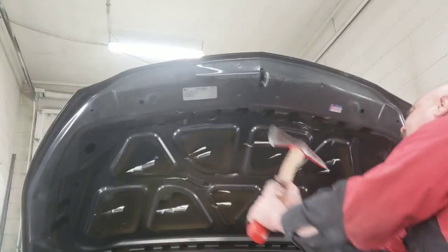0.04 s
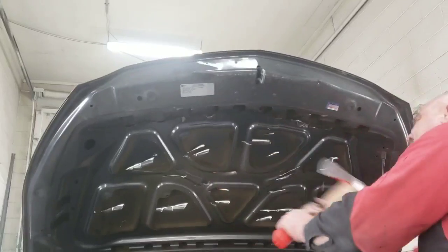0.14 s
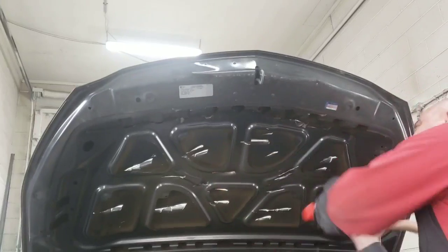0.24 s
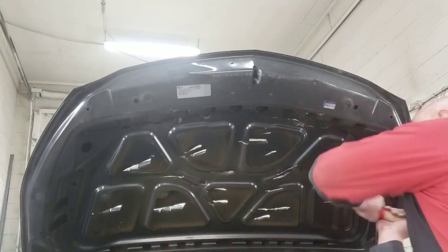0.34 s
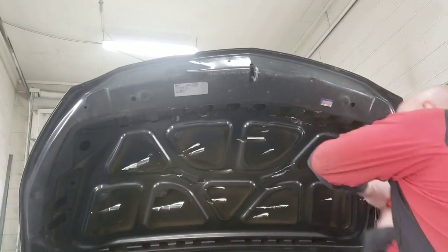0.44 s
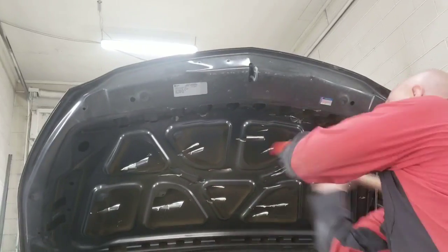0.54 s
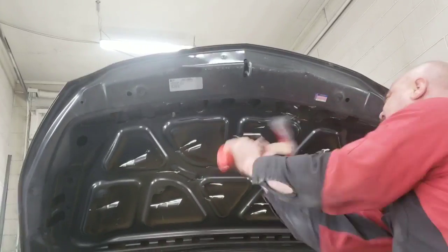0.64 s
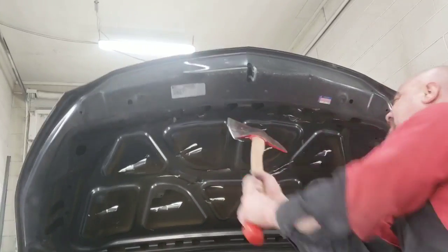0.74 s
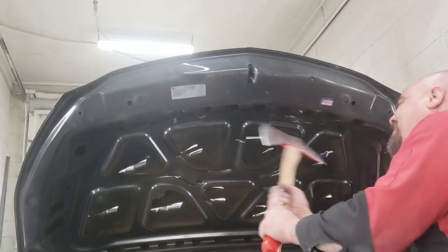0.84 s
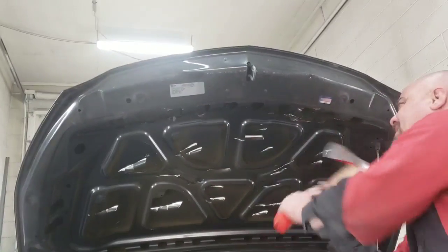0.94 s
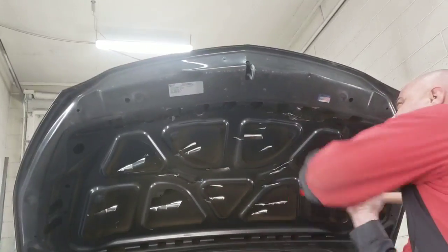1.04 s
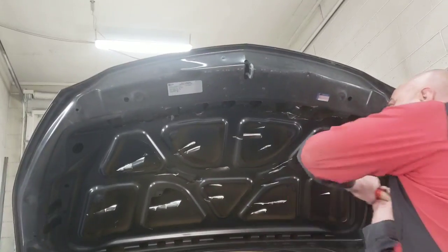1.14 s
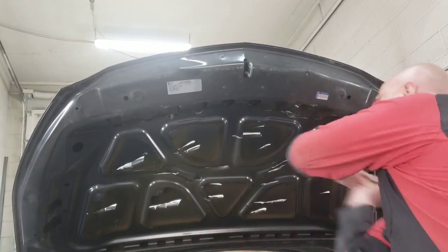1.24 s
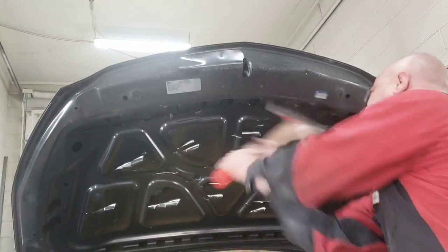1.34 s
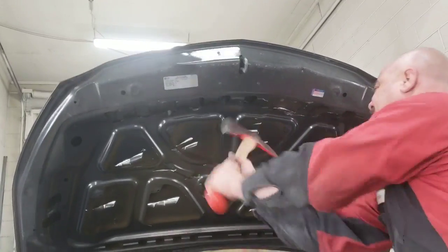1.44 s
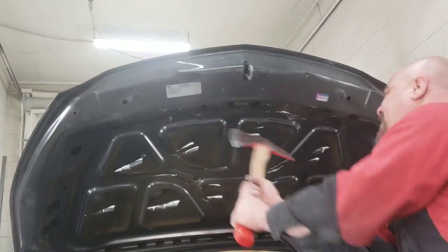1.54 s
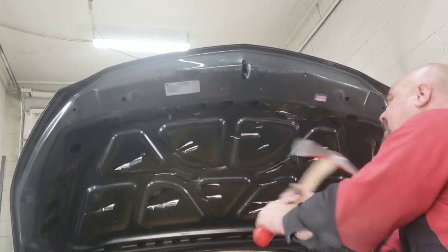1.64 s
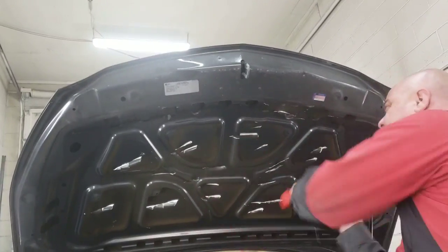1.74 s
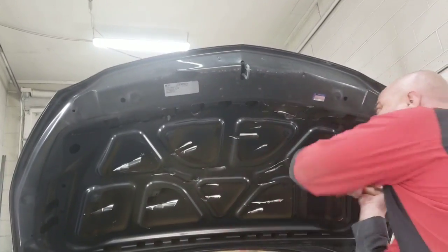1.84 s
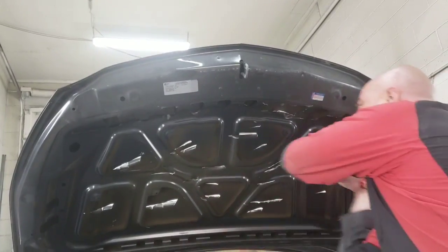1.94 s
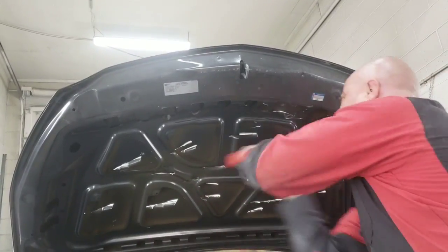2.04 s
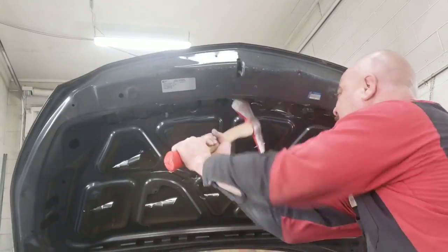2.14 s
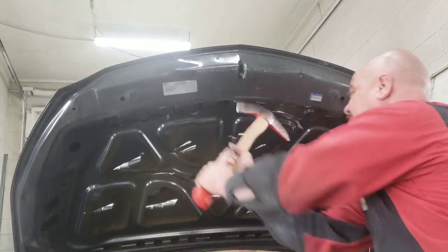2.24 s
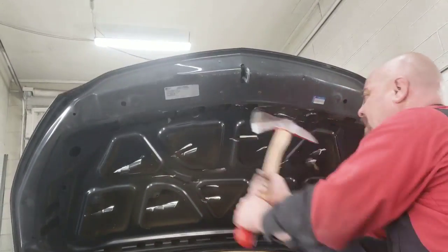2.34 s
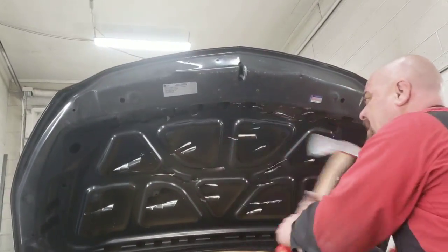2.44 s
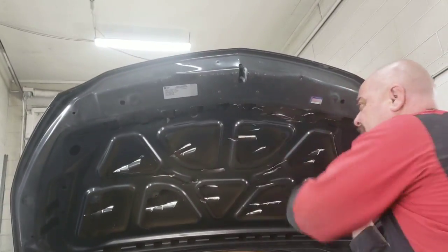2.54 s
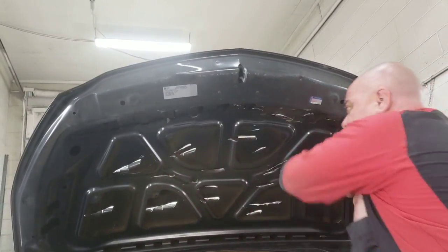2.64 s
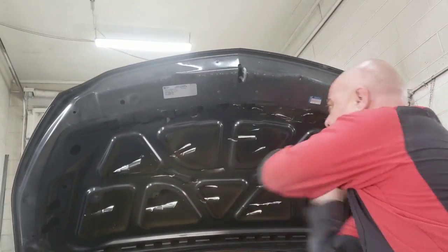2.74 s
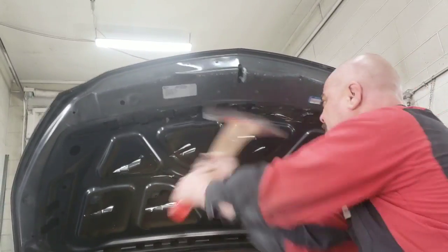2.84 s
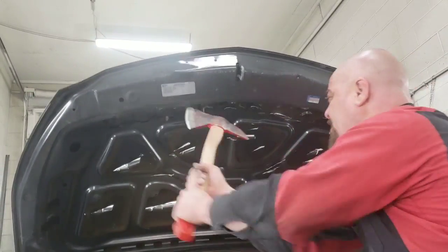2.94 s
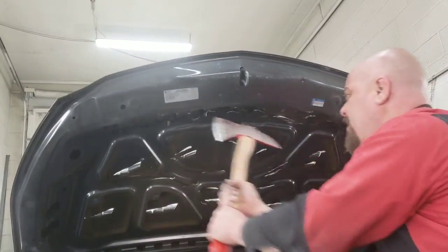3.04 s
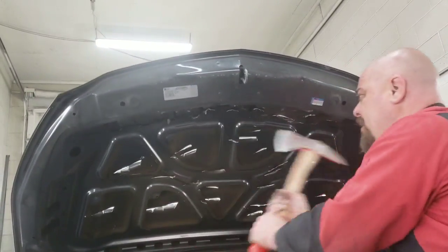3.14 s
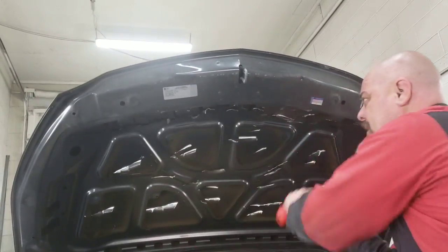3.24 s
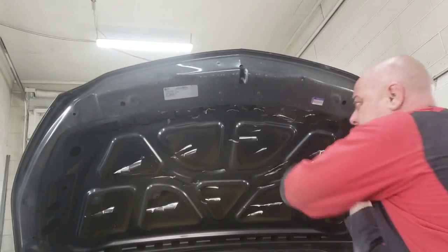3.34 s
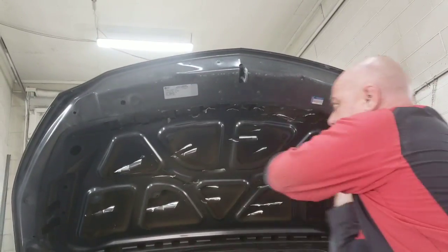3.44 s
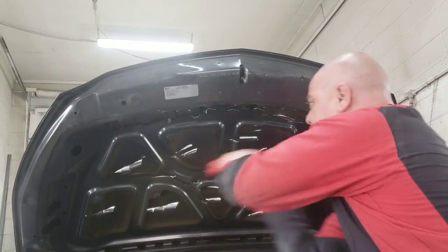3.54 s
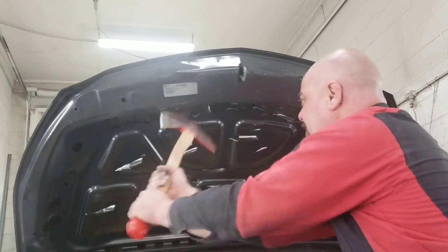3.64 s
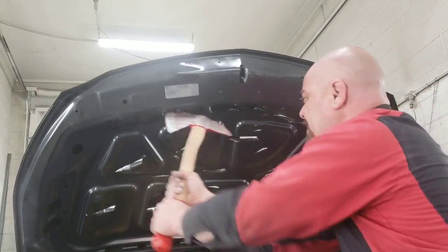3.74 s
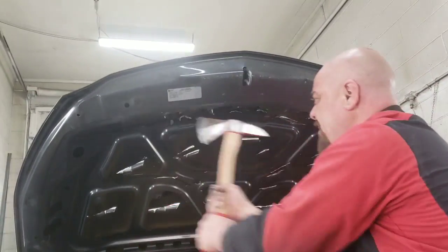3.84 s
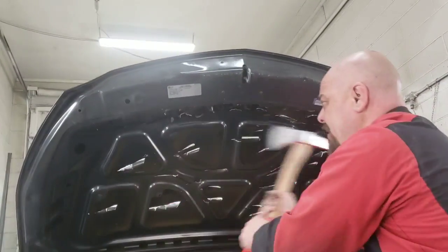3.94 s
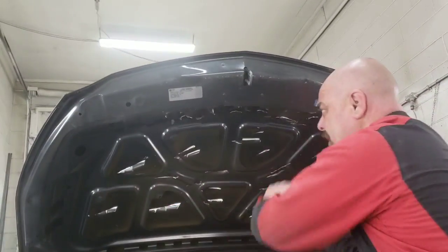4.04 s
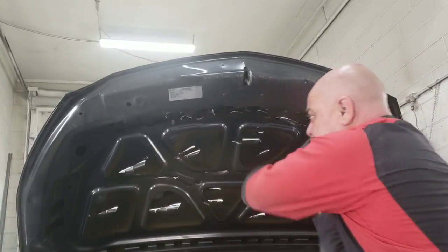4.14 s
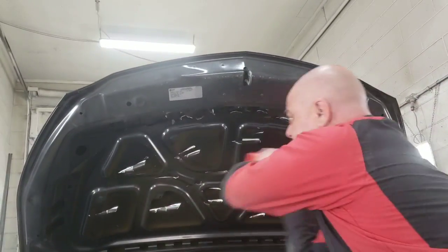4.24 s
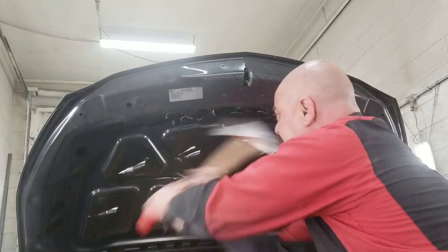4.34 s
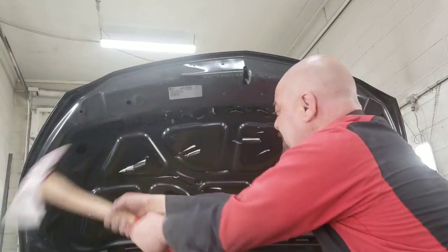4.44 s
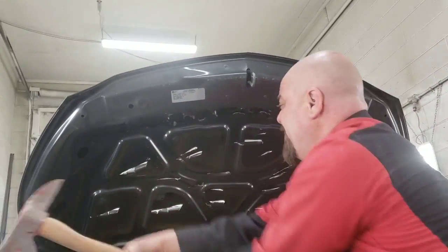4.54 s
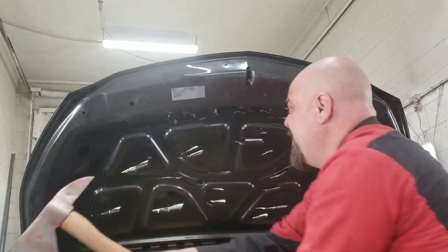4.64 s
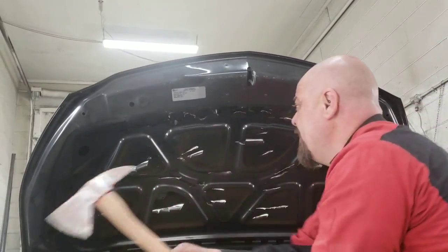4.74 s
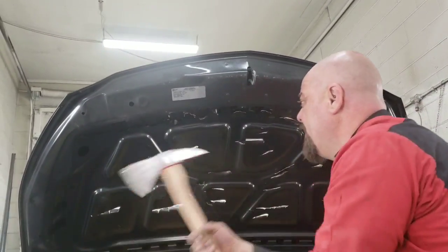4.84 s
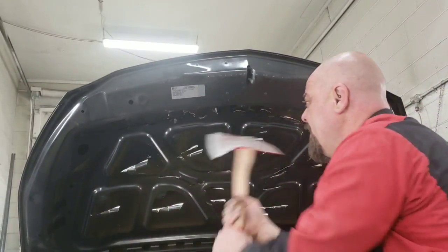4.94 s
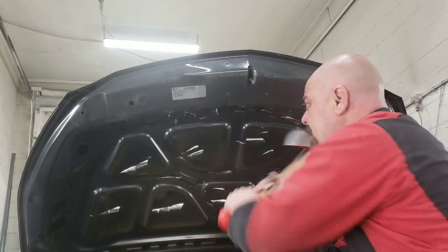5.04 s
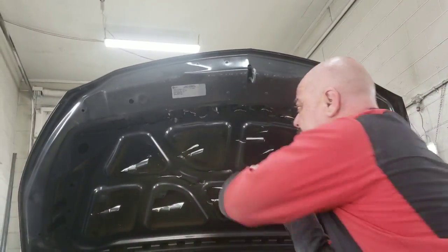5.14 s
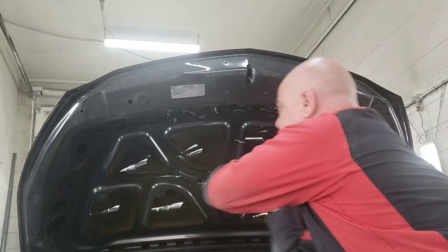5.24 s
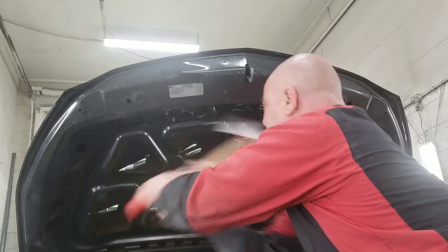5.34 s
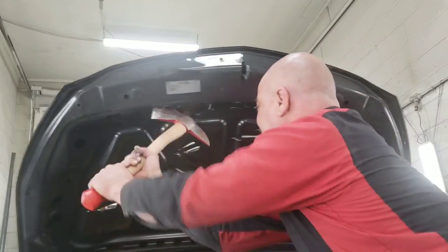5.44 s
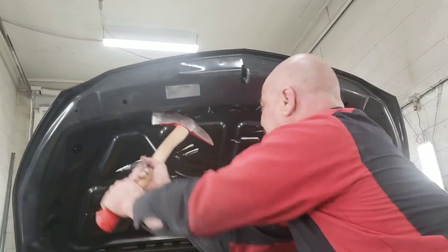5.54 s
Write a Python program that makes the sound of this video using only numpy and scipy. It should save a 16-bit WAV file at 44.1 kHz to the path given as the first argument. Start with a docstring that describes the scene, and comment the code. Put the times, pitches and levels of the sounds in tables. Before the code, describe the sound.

A hatchet hits a steel car hood eight times in a bare workshop, each loud crash crumpling, clanging and ringing into the next.

```python
"""A hatchet strikes the underside of an open steel car hood eight times in a bare, hard-walled workshop.
Each blow opens with a broadband crack and a burst of small snaps, while shaped noise roars as the sheet
crumples. Decaying modes clang and narrow noise clusters zing; a dense ring then dies away, treble first.
After some blows the blade catches the metal again on its way out, with a short rasp and further zings.
Quiet workshop air, a floor of noise in third-octave bands, lies beneath throughout."""
import sys
import numpy as np
from scipy import signal
from scipy.io import wavfile

SR = 44100
rng = np.random.default_rng(int(sys.argv[2]) if len(sys.argv) > 2 else 0)


def to_wav(s):
    """Save 16-bit WAV."""
    ch = np.atleast_2d(s).T  # columns
    pcm = np.round(np.clip(ch, -1, 1) * 32767)  # PCM
    wavfile.write(sys.argv[1], SR, pcm.astype(np.int16))


N = 246914
LEAD = SR // 10   # samples computed before t = 0, since the first blow lands earlier
TIME = np.arange(-LEAD, N) / SR
BAND_HZ = 1000 * 2 ** (np.arange(-14, 13) / 3)   # third-octave centres


def from_db(db):
    """Level to amplitude: 20 dB is a factor of ten."""
    return 10 ** (np.asarray(db) / 20)


def at_hz(points, hz):
    """Interpolation of a table along logarithmic frequency."""
    points = np.array(points)
    return np.interp(np.log(hz), np.log(points[:, 0]), points[:, 1])


def band_gains(spectrum):
    """Band power is spectral density times bandwidth; the powers are scaled to sum to 1."""
    gains = from_db(at_hz(spectrum, BAND_HZ)) * np.sqrt(BAND_HZ)
    return gains / np.linalg.norm(gains)


def fade(age, t60):
    """Exponential decay: the level falls 60 dB in t60 seconds, starting at age 0."""
    return np.exp(-np.log(1000) * np.maximum(age, 0) / t60)


def build_up(age, rise_s):
    """Exponential growth towards 1 with a time constant."""
    return 1 - np.exp(-age / rise_s)


def add(track, s, sound):
    """Superposition: a sound is summed into a track from time s on."""
    start = max(round(s * SR) + LEAD, 0)
    track[..., start:start + sound.shape[-1]] += sound[..., :track.shape[-1] - start]


def high_pass(low_hz):
    """Second-order Butterworth high-pass."""
    return signal.butter(2, low_hz, "high", fs=SR, output="sos")


def drift(rate):
    """Slow random modulation: normal values, `rate` per second, joined by straight lines."""
    knots = rng.standard_normal(400)
    return np.interp((TIME - TIME[0]) * rate, np.arange(len(knots)), knots)


def blow_colour(hz, boom_db, bite_db, sizzle_db):
    """Excitation spectrum: where and how squarely the blade lands tilts it around the main clang."""
    tilt = [(60, 1.4 * boom_db), (180, boom_db), (480, 0.0039), (1300, bite_db), (10000, sizzle_db)]
    return from_db(at_hz(tilt, hz))


# correlation of the left and right channels: f/Hz, likeness (-1 to 1)
STEREO_LIKENESS = [(60, 0.91), (200, 0.99), (380, 0.84), (700, 0.6), (1290, -0.59), (2400, 0.44),
                   (4400, -0.094), (15000, 0.067)]


def band_noise(hz):
    """High modal density: countless overlapping modes sound as third-octave noise, in stereo, rms 1."""
    edges = hz * 2 ** (np.array([-1, 1]) / 6)
    sos = signal.butter(2, edges, "band", fs=SR, output="sos")
    mid, side = signal.sosfilt(sos, rng.random((2, len(TIME))) - .5)
    alike = np.clip(at_hz(STEREO_LIKENESS, hz), -.99, .99)
    pair = np.sqrt(1 + alike) * mid + np.sqrt(1 - alike) * side * [[1], [-1]]
    return pair / pair.std()


def mode(age, hz, t60, swell_s):
    """Damped oscillation: one mode, its phase further apart between channels that are less alike."""
    phase = rng.uniform(0, 2 * np.pi)
    apart = np.arccos(np.clip(at_hz(STEREO_LIKENESS, hz), -1, 1)) * rng.choice([-1, 1])
    swell = build_up(age, swell_s * np.sqrt(1000 / hz))
    angle = 2 * np.pi * hz * age + phase + apart * np.array([[.5], [-.5]])
    return swell * fade(age, t60) * np.sin(angle)


# hatchet blows: t/s, level/dB, boom level/dB, bite level/dB, sizzle level/dB, sink-in time constant at
# 1 kHz t/s, crumple time t/s, crack level/dB, dent pitch f/Hz, zing pitch f/Hz
BLOW_EVENTS = [ (-0.045, 0.5, 8, -1.5, -8, 0.033, 0.043, -10, 337, 12000),
               (0.703, 1, 1.5, 0, -4, 0.0055, 0.013, -18, 499, 1500),
               (1.456, -2.5, 1, 0, 0, 0.0023, 0.011, -24, 477.5, 7650),
               (2.209, -1.5, 2.5, -3, -1, 0.0028, 0.02, -10, 451, 12000),
               (2.951, -1, 0, 0.5, 1.5, 0.012, 0.008, -6, 407, 5100),
               (3.718, 1.5, -2, -3, -2, 0.0045, 0.0095, -21.5, 604, 12000),
               (4.473, 2, -9, -4, -3.5, 0.0078, 0.018, -3, 501.6, 3460),
               (5.477, -1, -6.5, -4, 0.5, 0.0054, 0.0047, -2, 402, 1450)]
# the blade catching on its way out: t/s, level/dB, sizzle level/dB
SNAG_EVENTS = [(1.676, -9.5, -32), (2.383, -20, 9.5), (2.414, -13.5, 8.5), (3.926, -7.5, -10),
               (4.765, -25.5, -12), (4.874, -32, -7)]
# relative spectral density of the crumpling sheet: f/Hz, level/dB per Hz
CRUMPLE_SPECTRUM = [(40, -29.5), (90, -22.5), (130, -19), (200, -1), (270, -16.5), (480, -2.5), (800, -5.5),
                    (1250, -8.5), (2500, -13.5), (5000, -17), (10000, -20), (12500, -17.5), (16000, -21)]
# relative spectral density of the long ring: f/Hz, level/dB per Hz
RING_SPECTRUM = [(40, -30), (62, -19), (90, -27.5), (130, -9), (250, -7), (320, -3.5), (500, -1), (800, -7),
                 (1350, -7.5), (2500, -15.5), (3700, -14.5), (6300, -20.5), (10000, -27), (12500, -31.5),
                 (16000, -53)]
# decay of the long ring of hood and room: f/Hz, t60 t/s
RING_DECAY = [(60, 0.87), (170, 0.99), (450, 1.47), (1000, 1.46), (2700, 1.32), (5400, 0.98), (8000, 0.78),
              (11000, 0.55), (15000, 0.54)]
BASS_LAG = 0.41   # the swell time grows with this power of the wavelength in air


def sheet(crash_db, crash_t60, ring_db, ring_build_s, snag_rise_s, snag_t60, snag_ring_db,
          flutter_db, flutter_rate, shared_flutter_db):
    """Statistical energy: band powers of crumpling, ring and air add up and drive dense modal noise."""
    out, age = np.zeros((2, len(TIME))), np.arange(int(1.5 * SR)) / SR
    # random level flutter shared by all bands
    shared_flutter = shared_flutter_db * drift(55)
    for hz, crash_gain, ring_gain in zip(BAND_HZ, band_gains(CRUMPLE_SPECTRUM), band_gains(RING_SPECTRUM)):
        # bending waves are slower at low pitch, so the bass swells later
        slowness = (1000 / hz) ** BASS_LAG
        t60 = at_hz(RING_DECAY, hz)
        crash = from_db(crash_db) * crash_gain
        # the decay is scaled so that the ring takes its table's colour 0.2 s after a blow
        decay = fade(age, t60) / fade(0.2, t60)
        ring = from_db(ring_db) * ring_gain * decay * build_up(age, ring_build_s)
        power = air_power(hz)

        for s, db, boom, bite, sizzle, sink_s, crumple_s, *_ in BLOW_EVENTS:
            rise = build_up(age, sink_s * slowness)
            # the crash holds until the crumple time, then decays
            blow = (crash * fade(age - crumple_s, crash_t60)) ** 2 + ring ** 2
            gain = from_db(db) * blow_colour(hz, boom, bite, sizzle)
            add(power, s, blow * (rise * gain) ** 2)

        rasp = crash * fade(age, snag_t60) * build_up(age, snag_rise_s)
        snag = rasp ** 2 + (from_db(snag_ring_db) * ring) ** 2
        for s, db, sizzle in SNAG_EVENTS:
            gain = from_db(db) * blow_colour(hz, 0, sizzle / 2, sizzle)
            add(power, s, snag * gain ** 2)

        # each band also flares and sinks on its own; both flutters are weaker in the treble,
        # where crowded modes average out
        flutter = (shared_flutter + flutter_db * drift(flutter_rate)) / np.hypot(1, hz / 1800)
        out += np.sqrt(power) * from_db(flutter) * band_noise(hz)
    return out


# strongest modes of the hood: f/Hz, relative level/dB, t60 t/s
HOOD_MODES = [(65.6, -55, 0.56), (132.2, -36.5, 0.86), (171, -35, 0.4), (204.8, -24.5, 0.75),
              (220.8, -37, 2.55), (295, -29, 1.48), (313.3, -21, 0.54), (346, -33, 1.3), (365, -36.5, 1.5),
              (417, -36, 0.82), (470, -38, 0.36), (472.7, -24, 1.17), (540, -24, 0.25), (650, -32, 2.03),
              (682, -34.5, 0.75), (902, -16.5, 0.28), (1420, -27.5, .35), (2080, -31.5, 0.32),
              (3400, -36, 0.44)]


def clang(modes_db, scatter_db, dent_db, dent_t60, swell_s):
    """Modal superposition: blows ring the hood's modes with new strengths, and the dent at its pitch."""
    out, age = np.zeros((2, len(TIME))), np.arange(int(1.2 * SR)) / SR
    for s, db, boom, bite, sizzle, *_, dent_hz, _ in BLOW_EVENTS:
        add(out, s, from_db(db + dent_db) * mode(age, dent_hz, dent_t60, swell_s))
        for hz, mode_db, t60 in HOOD_MODES:
            level_db = modes_db + db + mode_db + scatter_db * rng.normal()
            gain = from_db(level_db) * blow_colour(hz, boom, bite, sizzle)
            add(out, s, gain * mode(age[:int(t60 * SR)], hz, t60, swell_s))
    return out


def cracks(crack_db, crack_t60, low_hz, snaps_per_s, snap_db, snap_t60):
    """Impulsive excitation: the edge bites with a crack; snaps follow as it sinks in and steel buckles."""
    clicks, age = np.zeros((2, len(TIME))), np.arange(SR // 4) / SR
    for s, db, _, _, sizzle, sink_s, _, edge_db, *_ in BLOW_EVENTS:
        noise = rng.standard_normal((2, len(age)))
        contact = from_db(crack_db + edge_db) * fade(age, crack_t60) * noise
        # single-sample impulses at random times, the same in both channels
        snaps = (rng.random(len(age)) < snaps_per_s / SR) * rng.uniform(-0.92, 1, len(age))
        buckling = build_up(age, sink_s) * fade(age, snap_t60)
        add(clicks, s, contact + from_db(snap_db + db + sizzle) * snaps * buckling)
    return signal.sosfilt(high_pass(low_hz), clicks)


# clusters of close modes with which blade and sheet sing: f/Hz, width f/Hz, relative level/dB, t60 t/s
ZING_CLUSTERS = [(1500, 150, -23.5, 0.14), (3400, 460, -23.5, 0.2), (5130, 150, -28.5, 0.2),
                 (7760, 260, -30.5, 0.35), (12000, 420, -29, 0.5)]
SNAG_ZING_HZ = 1800
ZING_FOCUS_DB, ZING_FOCUS_OCTAVES = 5.5, 0.33   # clusters near a touch's zing pitch sing louder


def zings(blow_db, snag_db, scatter_db, rise_s, room_t60, room_db):
    """Narrow-band resonance: each touch sets the clusters singing; a weaker, slower room decay follows."""
    out, age = np.zeros((2, len(TIME))), np.arange(int(.7 * SR)) / SR
    touches = [(s, blow_db + db, bite, sizzle, zing_hz)
               for s, db, _, bite, sizzle, *_, zing_hz in BLOW_EVENTS]
    touches += [(s, snag_db + db, sizzle / 2, sizzle, SNAG_ZING_HZ) for s, db, sizzle in SNAG_EVENTS]
    for hz, width_hz, cluster_db, t60 in ZING_CLUSTERS:
        decay = np.hypot(fade(age, t60), from_db(room_db) * fade(age, room_t60))
        envelope = build_up(age, rise_s) * decay
        resonator = signal.iirpeak(hz, hz / width_hz, fs=SR)
        for s, db, bite, sizzle, zing_hz in touches:
            cluster = signal.lfilter(*resonator, rng.random((2, len(age))) - .5)
            octaves_off = np.log2(hz / zing_hz)
            focus_db = ZING_FOCUS_DB * np.exp(-(octaves_off / ZING_FOCUS_OCTAVES) ** 2)
            level_db = db + cluster_db + focus_db + scatter_db * rng.normal()
            gain = from_db(level_db) * blow_colour(hz, 0, bite, sizzle)
            add(out, s, gain * envelope * cluster / cluster.std())
    return out


def panel_echoes(x, echo_db, echo_t60, fade_t60, low_hz):
    """Interference: waves bouncing between dent and ribs carve peaks and dips into the treble."""
    high = signal.sosfiltfilt(high_pass(low_hz), x)
    starts = np.array([s for s, *_ in BLOW_EVENTS])
    spot = np.searchsorted(starts[1:], TIME, side="right")   # index of the latest blow
    age, echoes = np.arange(SR // 16) / SR, np.zeros_like(x)
    for k in range(len(BLOW_EVENTS)):
        # each blow has its own random echo paths
        paths = rng.standard_normal(len(age)) * fade(age, echo_t60)
        paths /= np.linalg.norm(paths)
        add(echoes, TIME[spot == k][0], signal.fftconvolve(high[:, spot == k], [paths]))
    # the echoes give way as the room takes over
    share = from_db(echo_db) * fade(TIME - starts[spot], fade_t60)
    return x - high + (high + share * echoes) / np.hypot(1, share)


# quiet air of the workshop: f/Hz, level/dB in a third of an octave
AIR_SPECTRUM = [(40, -91.5), (150, -76), (500, -79), (2000, -88.5), (6000, -77), (14000, -74)]


def air_power(hz):
    """Stationary background noise: one constant power in each third-octave band."""
    return np.full(len(TIME), from_db(at_hz(AIR_SPECTRUM, hz)) ** 2)


def scene():
    """Superposition of sheet, clang, zings and cracks; a level difference leans them to the left."""
    hood = sheet(crash_db=-10.5, crash_t60=0.36, ring_db=-23.0, ring_build_s=0.098,
                 snag_rise_s=0.00056, snag_t60=0.094, snag_ring_db=-5.0,
                 flutter_db=2.0, flutter_rate=32, shared_flutter_db=2.17)
    hood = panel_echoes(hood, echo_db=0.0, echo_t60=0.024, fade_t60=3.0, low_hz=1010)
    hood += clang(modes_db=-2.5, scatter_db=1.5, dent_db=-17.0, dent_t60=0.35, swell_s=0.007)
    hood += zings(blow_db=3.0, snag_db=2, scatter_db=4.5, rise_s=0.0015, room_t60=1.0, room_db=-23)
    hood += cracks(crack_db=-15.0, crack_t60=0.027, low_hz=2360,
                   snaps_per_s=620, snap_db=-6.5, snap_t60=0.262)
    left_db = .45   # raises the left channel and lowers the right
    return hood[:, LEAD:] * from_db([[left_db], [-left_db]])


def record(dry):
    """Soft saturation rounds the highest peaks; a steep low-pass cuts the top."""
    top, cutoff_hz = 4.2, 15700
    rounded = top * np.tanh(dry / top)
    low_pass = signal.ellip(10, .2, 80, cutoff_hz, fs=SR, output="sos")
    return signal.sosfilt(low_pass, rounded)


dry = scene()
out = record(dry)
to_wav(out)
```